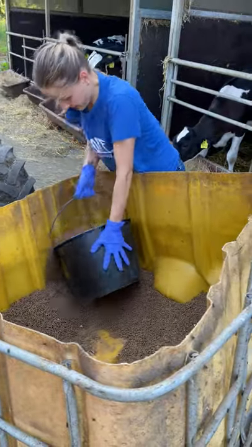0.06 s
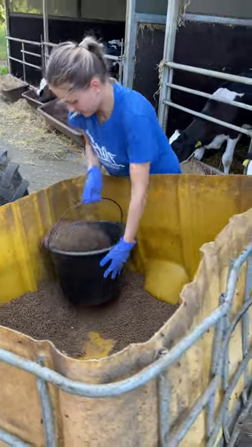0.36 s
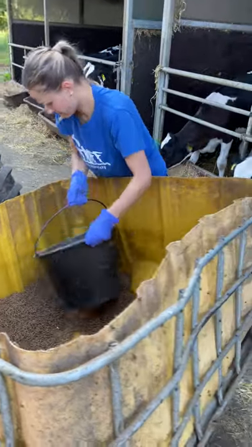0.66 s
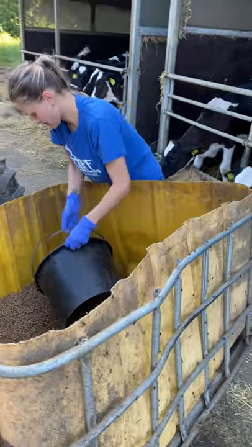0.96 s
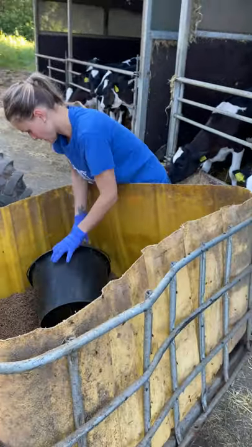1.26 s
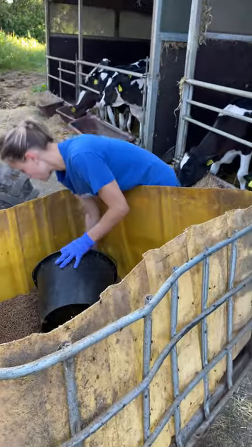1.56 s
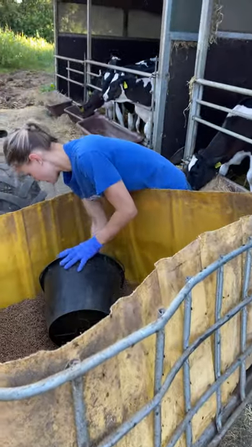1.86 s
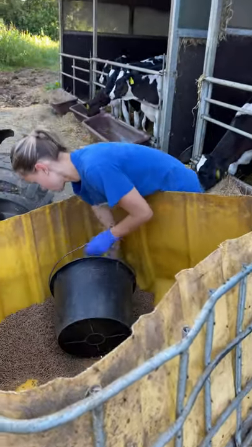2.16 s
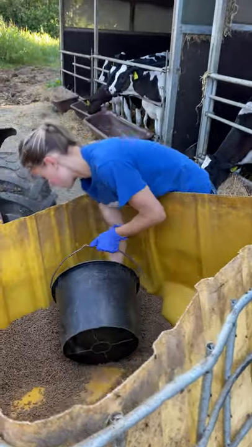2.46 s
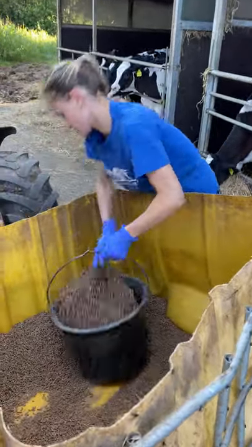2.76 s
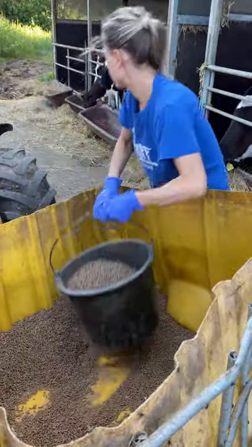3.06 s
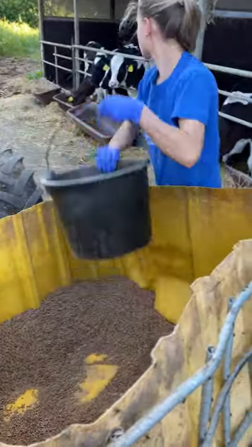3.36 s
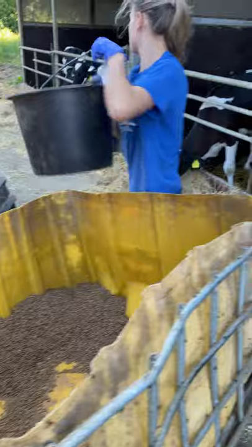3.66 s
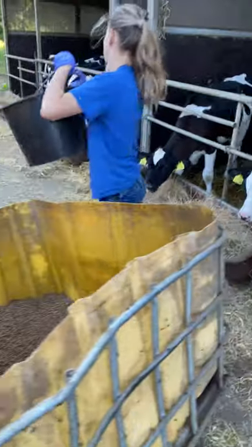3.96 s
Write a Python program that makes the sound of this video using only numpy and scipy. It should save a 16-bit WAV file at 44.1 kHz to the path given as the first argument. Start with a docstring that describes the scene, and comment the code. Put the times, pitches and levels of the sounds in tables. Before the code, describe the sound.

Dry feed pellets rustle and drum against a plastic bucket scooping close by in a plastic bin. One hard knock comes as it digs in, then more pushes and a final spill. A diesel engine idles in the yard.

```python
"""A plastic bucket scoops feed pellets from a plastic bin; in the yard a diesel idles throughout.
First the heap is shaken off: pellets rustle on each other and drum on the bucket, which bumps the bin.
At 1 s the bucket digs in; one hard knock makes the limiter duck everything briefly. Two pushes follow.
From 2.1 s the bucket turns upright, its wire handle ticking; at 2.7 s it comes free and overflows.
From 3.7 s the load settles."""
import sys
import numpy as np
from scipy import signal
from scipy.fft import rfft, irfft
from scipy.io import wavfile
from scipy.ndimage import uniform_filter1d, minimum_filter1d

SR = 44100
rng = np.random.default_rng(int(sys.argv[2]) if len(sys.argv) > 2 else 0)


def put_to_file(sound):
    """Save the sound as 16-bit audio at rate SR, in the file named by the first command-line argument."""
    columns = np.atleast_2d(sound).T  # one column per channel
    safe = np.clip(columns, -1, 1)
    whole_steps = np.round(safe * 32767)
    wavfile.write(sys.argv[1], SR, whole_steps.astype(np.int16))


N = 176400
TIME_S, FREQS_HZ = np.arange(N) / SR, np.fft.rfftfreq(N, 1 / SR)

# pellet flow, one curve per slide: time_s, rustle_db, drumming_db
SLIDES = [
    [(0, -40, -39), (.1, -34.5, -34.5), (.2, -32, -30), (.35, -39, -36), (.45, -35, -35.5), (.62, -40, -38),
     (.73, -40.5, -41.5), (.82, -53.5, -54)],
    [(1.015, -49, -60), (1.045, -36.5, -35), (1.085, -42.5, -30.5), (1.105, -45.5, -43),
     (1.16, -39.5, -23.5), (1.205, -42, -28), (1.24, -45, -42.5), (1.38, -59, -42.5)],
    [(1.42, -54.5, -44), (1.49, -42, -51), (1.55, -42.5, -39), (1.63, -50.5, -43.5), (1.73, -56, -52)],
    [(1.76, -52.5, -41.5), (1.87, -35.5, -41.5), (1.94, -38, -40), (1.985, -42.5, -44), (2.005, -30.5, -34),
     (2.035, -32.5, -35), (2.075, -46.5, -42.5)],
    [(2.09, -46.5, -53), (2.19, -45.5, -42.5), (2.29, -50.5, -38), (2.39, -57, -54), (2.48, -44.5, -38.5),
     (2.55, -51.5, -45.5), (2.61, -44.5, -41.5), (2.67, -37.5, -36), (2.725, -35.5, -37)],
    [(2.74, -30, -32), (2.805, -28.5, -38), (2.85, -34, -34), (2.92, -31.5, -38.5), (2.99, -36.5, -37.5),
     (3.07, -52, -65), (3.2, -60, -64), (3.33, -60, -61), (3.45, -64, -59)],
    [(3.66, -48.5, -68), (3.75, -45, -40.5), (3.82, -41.5, -48), (3.89, -46, -42.5), (4, -56.5, -57)],
]
# collision rate of each slide: grains_per_s
SLIDE_GRAINS_PER_S = [11920, 9050, 6990, 7900, 4850, 9170, 1080]
# rustle tilt of each slide, above 1 kHz: tilt_db_per_octave
SLIDE_TILTS = [0, 0.5, -0.5, 1.9, 1, 2, -4.5]
# pellet on pellet: freq_hz, gain_db
RUSTLE_SPECTRUM = [(900, -8.5), (1900, 1.5), (2800, 2), (3900, -1), (5100, -0.5), (6300, -5.5),
                   (8000, -8.5), (11000, -12.5), (16000, -17.5)]
# pellet on bucket wall: freq_hz, gain_db
DRUMMING_SPECTRUM = [(120, 13.5), (270, 13.5), (420, 6), (760, 6), (1100, 5), (1700, 1), (2300, -8),
                     (3500, -10), (7000, -66)]
# bucket resonances: pitch_hz, gain_db, t60_s
BUCKET_MODES = [(201, -10.5, 0.088), (260, -1.5, 0.085), (316, -9, 0.094), (515, -9, 0.031),
                (649, -5, 0.037), (845, -9.5, 0.08), (961, -5.5, 0.035), (1109, -2.5, 0.036),
                (1250, -13.5, 0.069), (1784, -2.5, 0.037), (2027, -14, 0.091), (3056, -7, 0.05),
                (5280, -11, 0.03)]
# rubbed wall resonances: peak_s, sigma_s, pitch_hz, rise_hz_per_s, t60_cycles, level_db
RUBS = [(.22, .11, 2720, 0, 60, -42), (.22, .1, 3080, 0, 60, -44), (.2, .12, 4150, 0, 40, -44),
        (.5, .15, 2900, 300, 45, -45), (1.555, .035, 2250, 0, 14, -41), (1.87, .06, 1150, 1500, 10, -43.5),
        (2.015, .017, 2840, 0, 100, -35), (2.76, .045, 1070, 500, 28, -34.5),
        (2.785, .055, 1290, 400, 28, -34.3), (2.82, .08, 1900, 1200, 9, -34.5),
        (2.88, .1, 2860, 0, 90, -40), (2.8, .1, 5100, 0, 30, -39), (2.96, .065, 1410, 700, 22, -38.5)]
# bucket on bin: start_s, level_db, sharpness_hz
KNOCKS = [(0.203, -17, 348), (0.411, -32, 600), (0.591, -16.5, 400), (1.055, -23, 700),
          (1.086, -17.5, 1080), (1.1307, -6, 14000), (1.273, -26, 1200), (2.434, -23.5, 760),
          (2.835, -26, 600)]
# hard contact: freq_hz, gain_db
CRACK_SPECTRUM = [(200, 17.5), (500, 8), (1100, 3.5), (2200, 0.5), (3500, 0.5), (5500, -1.5), (7500, -8),
                  (11000, -1.5), (16000, -11)]
# handle and stray pellets: start_s, level_db, centre_hz
TICKS = [(0.053, -30.5, 6850), (1.1794, -15.5, 1370), (1.1834, -23, 2000), (1.339, -30, 2020),
         (2.109, -30.5, 2100), (2.497, -35.5, 10000), (3.149, -40, 8700), (3.365, -41, 3950)]
# idle speed: time_s, firing_hz
IDLE_RATE = [(0, 33.05), (2.3, 33.05), (2.6, 33.14), (3.25, 33.13), (3.5, 33.05), (4, 33.08)]
# exhaust harmonics: firing_order, level_db
EXHAUST_HARMONICS = [(1, -53), (2, -29.5), (3, -22.5), (4, -24.5), (5, -31.5), (6, -34.5), (8, -48),
                     (9, -51)]
# higher engine tone: time_s, level_db
DRONE_LEVEL = [(0, -75), (1.3, -54), (2.6, -44.5), (3.68, -41.5), (3.8, -51)]
# engine clatter and open yard: freq_hz, density_db
YARD_SPECTRUM = [(20, -50), (40, -64), (60, -53), (130, -53), (250, -65.5), (400, -71), (650, -73),
                 (1000, -78), (1700, -83), (2050, -79.5), (2280, -78.5), (2550, -86.5), (4000, -93),
                 (6000, -95.5), (10000, -101), (16000, -103)]
# machine whine: time_s, level_db
WHINE_LEVEL = [(1, -59), (1.55, -64), (2.2, -61), (2.35, -54), (2.55, -62), (3.2, -61), (3.45, -53),
               (3.62, -60)]
# left-right likeness at the bin: freq_hz, correlation
BIN_CORRELATION = [(150, 0.85), (300, 1), (640, 0.65), (1400, 0.97), (3000, 0.63), (5000, 0.68), (7000, 1),
                   (15000, 0.96)]
# left-right likeness of the yard: freq_hz, correlation
YARD_CORRELATION = [(150, 0.97), (300, 0.9), (640, 0.33), (1400, 0.42), (3000, 0.21), (5000, 0.43),
                    (7000, 1), (15000, 1)]
# microphone balance: freq_hz, left_minus_right_db
MIC_BALANCE = [(100, 0.27), (290, .5), (450, 1.5), (740, 5.5), (1220, 6.5), (2000, -0.2), (3300, .3),
               (5200, -0.5), (8000, -0.5)]
# microphone phase: freq_hz, left_lead_rad
MIC_PHASE = [(0, 0), (1800, 0), (2500, .8), (4300, 1.4), (5400, .7), (7250, 3.14), (10300, 6.28),
             (13550, 9.42), (16700, 12.5)]


def from_db(db):
    """Decibels to gain."""
    return 10 ** (np.asarray(db) / 20)


def unit_rms(x):
    """Scale to rms 1."""
    return x / np.sqrt(np.mean(x ** 2) + 1e-20)


def over_time(rows):
    """Each column of a curve at every sample."""
    times_s, *columns = np.transpose(rows)
    return [np.interp(TIME_S, times_s, column) for column in columns]


def over_hz(rows):
    """A curve at every bin, interpolated in log frequency."""
    freq_hz, value = np.transpose(rows)
    return np.interp(np.log(FREQS_HZ + 1), np.log(freq_hz), value)


def colour(x, gain_db):
    """Filter by a gain per bin."""
    return irfft(rfft(x) * from_db(gain_db), N)


def drift(corner_hz):
    """Smooth random motion, rms 1."""
    return unit_rms(irfft(rfft(rng.standard_normal(N)) / (1 + (FREQS_HZ / corner_hz) ** 2), N))


def stereo(pair, correlation):
    """Mix two independent signals to correlated left and right."""
    alike = np.clip(over_hz(correlation), 0, .995)
    mid, side = rfft(pair) * np.sqrt([(1 + alike) / 2, (1 - alike) / 2])
    return irfft([mid + side, mid - side], N)


def noise(correlation):
    """Stereo white noise."""
    return stereo(rng.standard_normal((2, N)), correlation)


def grains(per_s=4000, spread_db=3):
    """Random pellet impacts of uneven size, in stereo."""
    sizes = from_db(spread_db * np.minimum(rng.exponential(1, (2, N)), 5))
    signs = rng.choice([-1, 1], (2, N))
    struck = rng.random((2, N)) < per_s / SR
    return stereo(sizes * signs * struck, BIN_CORRELATION)


def ring(x, pitch_hz, t60_s):
    """One mode: a unit click rings a decaying unit sine."""
    radius = np.exp(-np.log(1000) / (t60_s * SR))
    step_rad = 2 * np.pi * pitch_hz / SR
    return signal.lfilter([0, np.sin(step_rad)], [1, -2 * radius * np.cos(step_rad), radius ** 2], x + 1e-18)


def decay(start_s, t60_s):
    """Instant onset, exponential decay."""
    return (TIME_S >= start_s) * from_db(-60 * np.clip((TIME_S - start_s) / t60_s, 0, 10))


def pellets(rustle_db=2, drumming_db=2, wall_db=-11.5):
    """Showers of tiny collisions: a bright rustle, and a duller drumming that rings the bucket."""
    octaves = np.log2(np.maximum(FREQS_HZ, 1000) / 4000)
    rustle, wall_flow = 0, 0
    for slide, tilt, per_s in zip(SLIDES, SLIDE_TILTS, SLIDE_GRAINS_PER_S):
        hits = grains(per_s, spread_db=3.5)
        outside_s = np.maximum(0, np.maximum(slide[0][0] - TIME_S, TIME_S - slide[-1][0]))
        flow, on_wall = from_db(over_time(slide)) * np.exp(-outside_s / .0065)
        rustle += flow * unit_rms(colour(hits, over_hz(RUSTLE_SPECTRUM) + tilt * octaves))
        wall_flow = np.maximum(wall_flow, on_wall)
    drumming = unit_rms(colour(grains(), over_hz(DRUMMING_SPECTRUM)))
    wall_hits = signal.sosfilt(signal.butter(2, 1200, "high", fs=SR, output="sos"), grains())
    wall = unit_rms(sum(from_db(db) * ring(wall_hits, hz, t60_s) for hz, db, t60_s in BUCKET_MODES))
    bucket = from_db(drumming_db) * drumming + from_db(wall_db) * wall
    return from_db(rustle_db) * rustle + wall_flow * bucket


def rubs():
    """Pellets dragged along the wall excite single resonances, some rising as the bucket fills."""
    hits, out = grains(), np.zeros((2, N))
    for peak_s, sigma_s, pitch_hz, rise_hz_per_s, t60_cycles, level_db in RUBS:
        near = np.abs(TIME_S - peak_s) < 3 * sigma_s
        offset_s = TIME_S[near] - peak_s
        glide = np.exp(2j * np.pi * (pitch_hz + rise_hz_per_s * offset_s / 2) * offset_s)
        pole = np.exp(-np.log(1000) * pitch_hz / (t60_cycles * SR))
        # gliding resonator: shift down, low-pass, shift back
        tone = np.real(glide * signal.lfilter([1], [1, -pole], hits[:, near] / glide))
        swell = np.exp(-.5 * (offset_s / sigma_s) ** 2)
        out[:, near] += from_db(level_db) * swell * unit_rms(tone)
    return out


def knocks(lag_at_1khz_s=.003):
    """Blows ring the bucket, highs first; sharp contacts also crack and scatter pellets."""
    start_s, level_db, sharpness_hz = np.transpose(KNOCKS)
    body, burst = 0, 0
    for pitch_hz, mode_db, t60_s in BUCKET_MODES:
        arrival_s = start_s + lag_at_1khz_s * np.sqrt(1000 / pitch_hz)
        contact_loss = np.sqrt(1 + (pitch_hz / sharpness_hz) ** 4)
        clicks = np.zeros(N)
        clicks[(arrival_s * SR).astype(int)] = from_db(level_db + mode_db) / contact_loss
        body += ring(clicks, pitch_hz, t60_s)
    for at_s, strength in zip(start_s, from_db(level_db) * sharpness_hz / sharpness_hz.max()):
        crack = from_db(-30) * decay(at_s, t60_s=.014)
        scatter = from_db(-1) * decay(at_s, t60_s=.07)
        burst += strength * (crack + scatter)
    return body + burst * unit_rms(colour(noise(BIN_CORRELATION), over_hz(CRACK_SPECTRUM)))


def bending_wave(boost_db=7, end_hz=222, sweep_hz=1830, fall_s=.0015,
                 attack_s=.003, hold_s=.011, t60_s=.04):
    """The hardest blow sweeps down into a thump: highs travel faster in the wall."""
    start_s, level_db, _ = max(KNOCKS, key=lambda knock: knock[1])
    age_s = np.maximum(TIME_S - start_s, 0)
    cycles = end_hz * age_s + sweep_hz * fall_s * (1 - np.exp(-age_s / fall_s))
    swell = 1 - np.exp(-age_s / attack_s)
    fade = from_db(-60 * np.clip((age_s - hold_s) / t60_s, 0, 10))
    return from_db(level_db + boost_db) * swell * fade * np.sin(2 * np.pi * cycles)


def ticks(t60_s=.035, octave_loss_db=7):
    """Wire handle and stray pellets: short bursts of band noise."""
    hiss, out = noise(BIN_CORRELATION), 0
    for start_s, level_db, centre_hz in TICKS:
        band_db = -octave_loss_db * np.log2((FREQS_HZ + 1) / centre_hz) ** 2
        out += from_db(level_db) * decay(start_s, t60_s) * unit_rms(colour(hiss, band_db))
    return out


def engine(first_firing_s=.024, jitter_s=52e-6, waver_db=1.27, drone_order=12, throb_depth=.17):
    """Idling diesel: one exhaust pulse per firing, a higher drone, clatter throbbing in step."""
    firing_hz, = over_time(IDLE_RATE)
    shift_s = jitter_s * drift(36) - first_firing_s
    phase_rad = 2 * np.pi * (np.cumsum(firing_hz) / SR + firing_hz * shift_s)
    exhaust = sum(from_db(db) * np.sin(order * phase_rad) for order, db in EXHAUST_HARMONICS)
    exhaust *= from_db(-waver_db * drift(45))
    drone = from_db(over_time(DRONE_LEVEL)[0] + drift(10)) * np.sin(drone_order * phase_rad)
    clatter = colour(noise(YARD_CORRELATION), over_hz(YARD_SPECTRUM)) * np.sqrt(SR / 2)
    throb = 1 - throb_depth * np.cos(phase_rad)
    return np.sqrt(2) * (exhaust + drone) + clatter * throb


def whine():
    """Faint machine whine: noise in a narrow resonance, swelling and fading."""
    tone = ring(noise(YARD_CORRELATION), pitch_hz=2360, t60_s=.06)
    return from_db(over_time(WHINE_LEVEL)[0]) * unit_rms(tone)


def scene():
    """Idling engine and whine under the scooping."""
    return engine() + whine() + pellets() + rubs() + knocks() + bending_wave() + ticks()


def record(dry, ceiling_db=-1, hold_s=.08, release_db_per_s=45, cutoff_hz=15900):
    """Microphone pair, limiter with hold and slow release, steep low-pass."""
    lead_rad = np.interp(FREQS_HZ, *np.transpose(MIC_PHASE))
    left_gain = from_db(over_hz(MIC_BALANCE) / 2) * np.exp(.5j * lead_rad)
    mics = irfft(rfft(dry) * np.array([left_gain, 1 / left_gain]), N)
    over_db = np.maximum(0, 20 * np.log10(np.abs(mics).max(0) + 1e-9) - ceiling_db)
    hold_samples = 2 * int(hold_s * SR / 2) + 1
    held_db = -minimum_filter1d(-over_db, hold_samples, origin=hold_samples // 2)
    release_db = release_db_per_s * TIME_S
    duck_db = np.maximum.accumulate(held_db + release_db) - release_db
    limited = mics * from_db(-uniform_filter1d(duck_db, size=16))
    return irfft(rfft(limited) / np.sqrt(1 + (FREQS_HZ / cutoff_hz) ** 200), N)


dry = scene()
out = record(dry)
put_to_file(out)
```